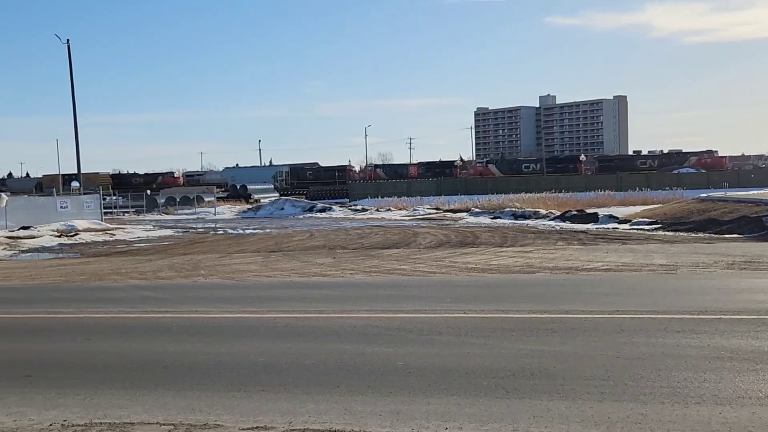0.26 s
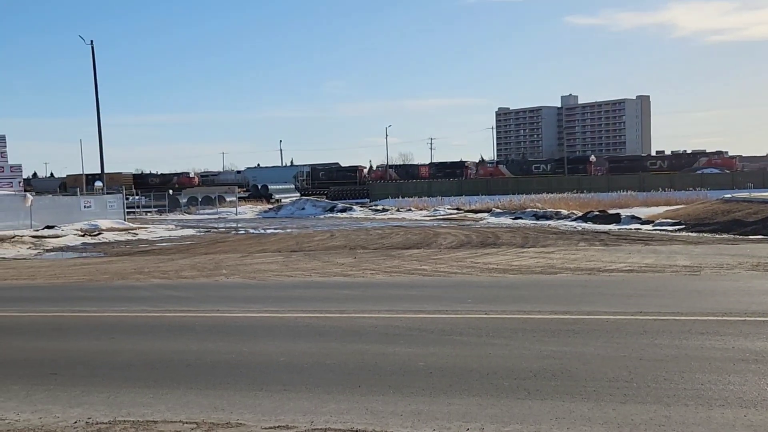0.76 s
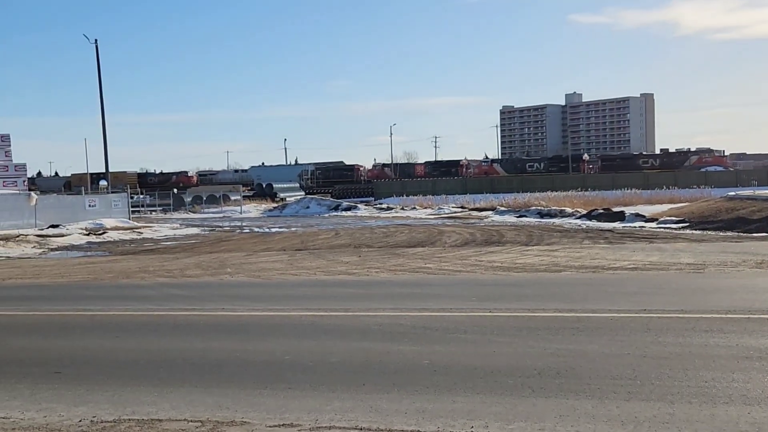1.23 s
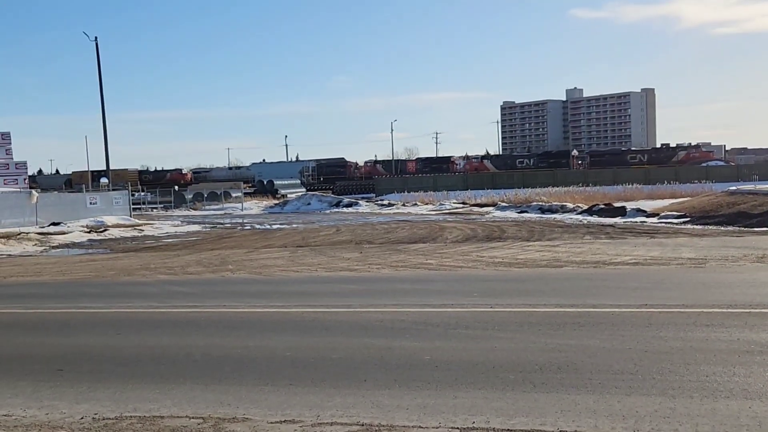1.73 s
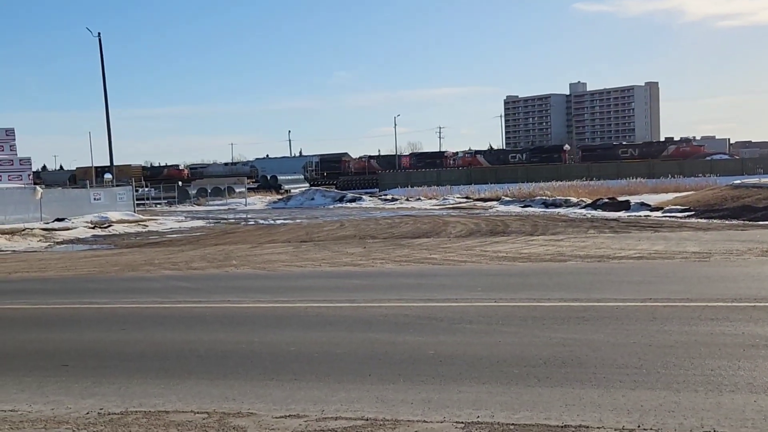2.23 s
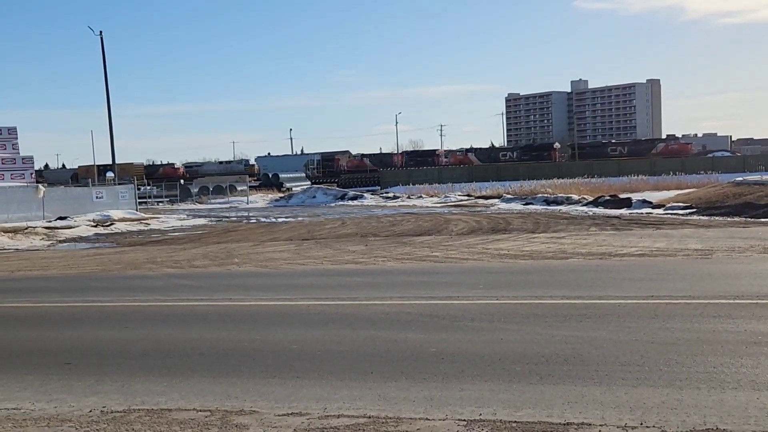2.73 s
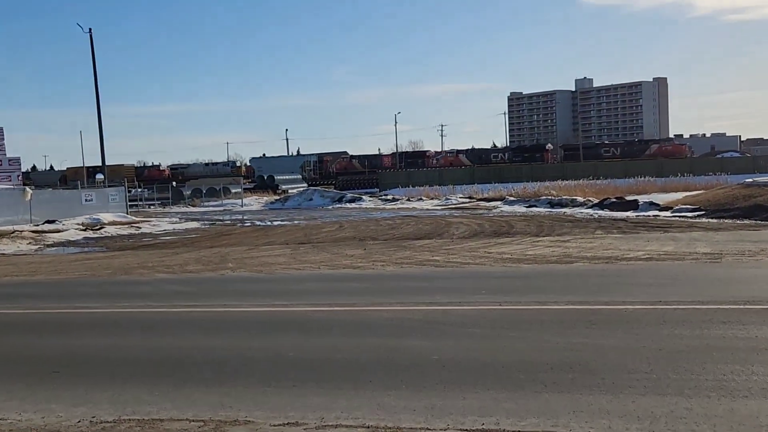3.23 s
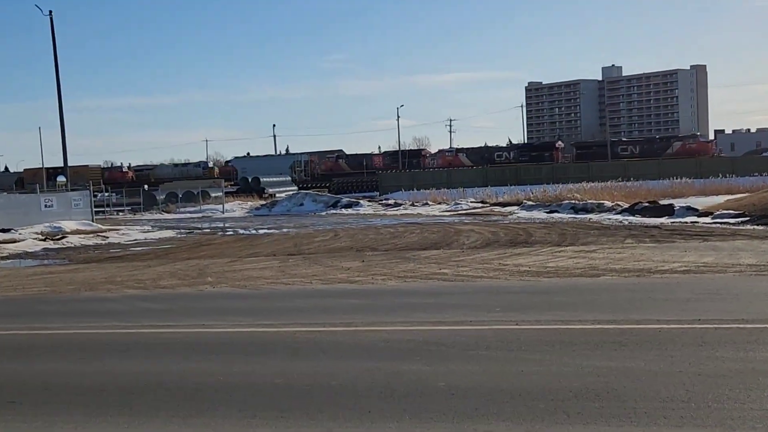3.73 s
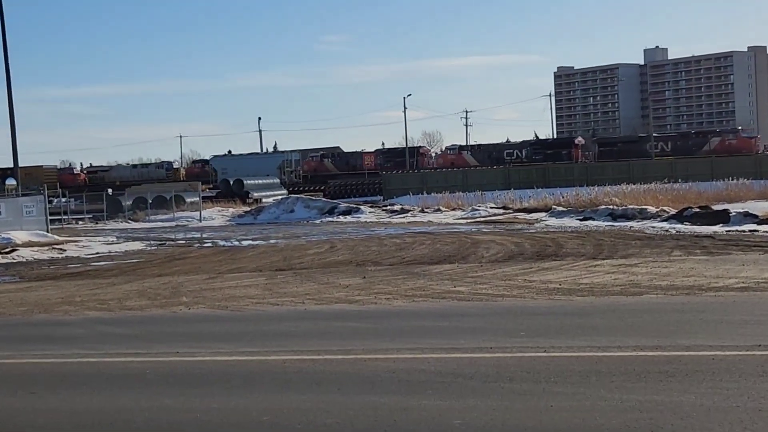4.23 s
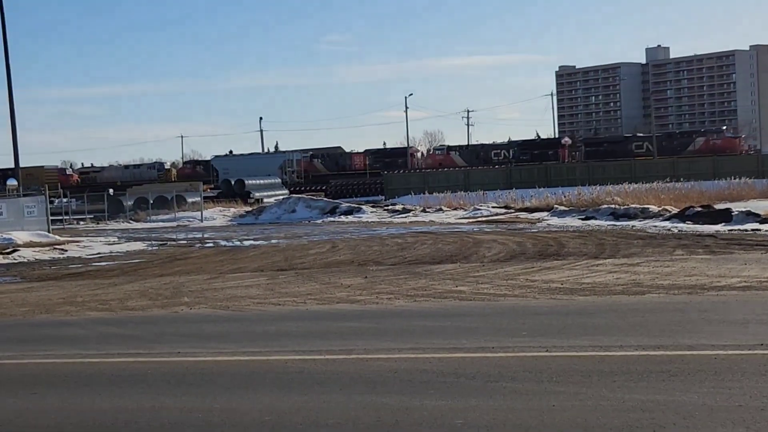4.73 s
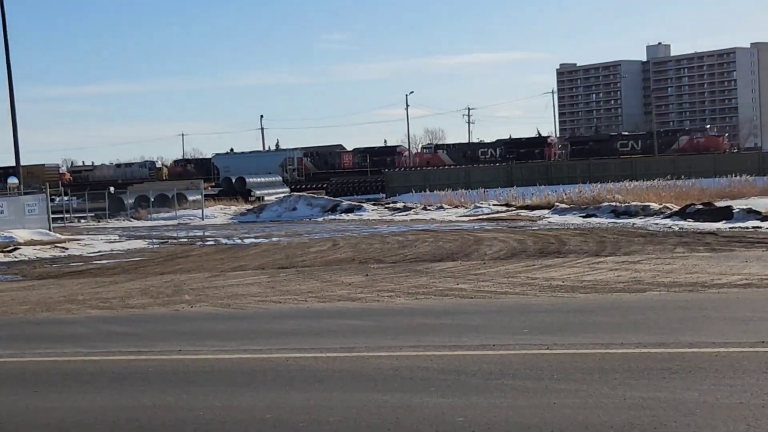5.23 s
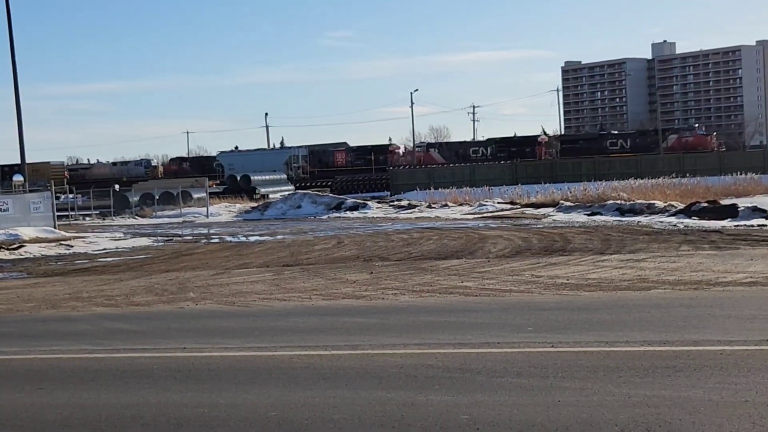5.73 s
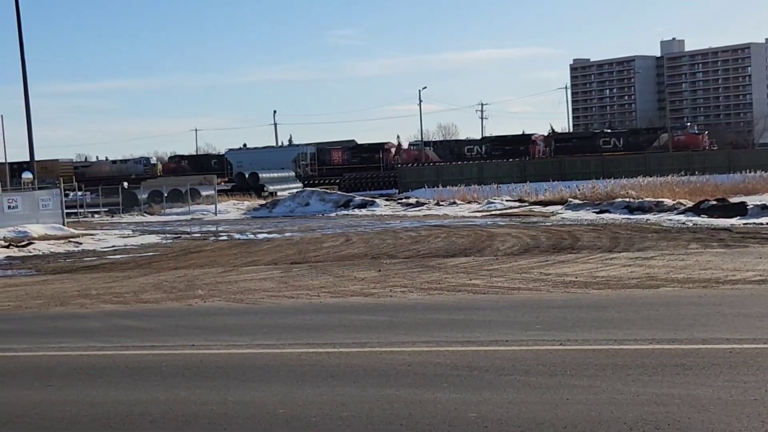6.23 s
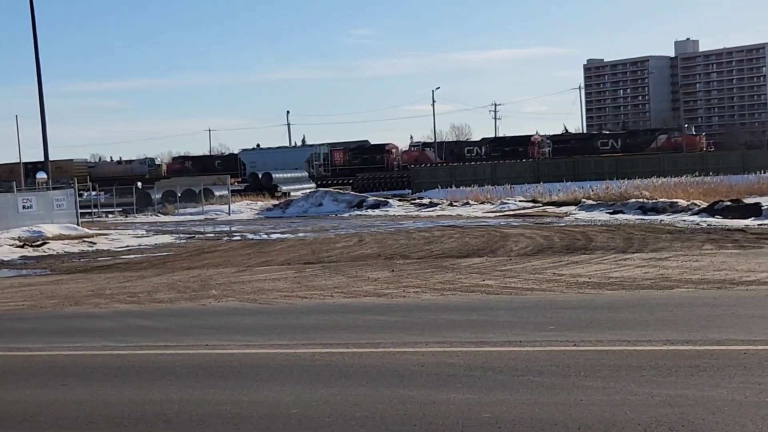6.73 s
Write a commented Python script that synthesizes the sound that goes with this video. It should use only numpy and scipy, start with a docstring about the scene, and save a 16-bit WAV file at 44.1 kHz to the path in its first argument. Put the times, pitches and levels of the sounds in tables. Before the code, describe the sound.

Diesel locomotives creep through a rail yard with a deep, uneven throb and a hollow roar of cooling fans, slowly growing louder. At the start, the tyre noise of a pickup that has just passed fades away to the left with a faint gritty hiss. A wheel rings faintly on the rail about five seconds in. Soft scuffs and tiny ticks sound close to the hand-held phone's microphone throughout.

```python
"""A deep diesel throb slowly swells over a roar of fans: locomotives creep through a rail yard across a road.
Unequal cylinders sound low tones and every firing puffs gas from the stack; a wheel flange sings briefly.
A pickup that has just passed fades away to the left; its tyres hiss on grit and throw one clicking stone.
Soft, gritty scuffs and a few small ticks sound close to the two microphone ports of a hand-held phone."""
import sys
import numpy as np
from scipy import signal
from scipy.fft import rfft, irfft, next_fast_len
from scipy.io import wavfile
from scipy.ndimage import uniform_filter1d, map_coordinates

SR = 44100
rng = np.random.default_rng(int(sys.argv[2]) if len(sys.argv) > 2 else 0)


def to_wav(s):
    """Save 16-bit WAV."""
    ch = np.atleast_2d(s).T  # columns
    pcm = np.round(np.clip(ch, -1, 1) * 32767)  # PCM
    wavfile.write(sys.argv[1], SR, pcm.astype(np.int16))


N = 307377
TIME = np.arange(N) / SR
SIZE = next_fast_len(N + 8192, True)
FREQ = np.maximum(np.arange(SIZE // 2 + 1) * SR / SIZE, 1)
PORT_LAG_S = 0.00055  # travel time from one port to the other

# the strongest exhaust swells: top_s, length_s, throb_lift_db, bark_lift_db, pitch_hz
SWELLS = [(0.04, 0.038, 8.5, -10, 60), (0.457, 0.077, 4.5, 2, 62), (0.596, 0.054, 2, 6.5, 56),
          (0.879, .07, 4, 1.5, 63), (0.991, .09, 6, 0, 59), (1.197, 0.09, 2, -4, 52),
          (1.581, .18, 4, -1.5, 55), (1.876, 0.085, 3, 1.5, 54), (2.395, 0.11, 4, 1.5, 51),
          (2.63, 0.091, 2.5, -2, 55.7), (2.875, .08, 3, 0.5, 55), (3.049, .12, 3, 0, 57),
          (3.411, 0.078, 1.5, 6.5, 55), (3.49, 0.1, 5.5, -1, 56), (3.855, .14, 3, 1.5, 62),
          (4.014, 0.072, 3, 3.5, 54), (4.313, 0.055, 3.5, 0.5, 52), (4.663, 0.14, 3, 2, 68),
          (4.775, 0.11, 3.5, 3.5, 55), (4.952, 0.14, 2.5, -1, 66), (5.267, .08, 2, 2, 59),
          (5.441, 0.15, 3, 3.5, 49), (5.553, 0.15, 4, 3, 56), (5.68, .08, 3.5, -2, 51),
          (5.798, 0.1, 4.5, 0, 69), (5.936, 0.13, 7.5, 2, 55), (6.199, .1, 2, 0, 50),
          (6.474, .12, 2, 2, 48), (6.619, 0.09, 3.5, -3, 66), (6.719, 0.072, 4, 3, 65)]


def undb(db):
    """Decibels to gain."""
    return 10 ** (np.asarray(db) / 20)


def unit(x):
    """Scale to rms 1."""
    return x / np.sqrt(np.mean(x ** 2))


def curves(rows):
    """Automation lanes: each column after the first, joined by straight lines in time."""
    times, *columns = np.transpose(rows)
    return [np.interp(TIME, times, column) for column in columns]


def step(at_s, span_s):
    """A smooth change from 0 to 1 around at_s."""
    return (1 + np.tanh((TIME - at_s) / span_s)) / 2


def swell(at_s, length_s):
    """A smooth rise from 0 to 1 and back."""
    return np.exp(-(2 * (TIME - at_s) / length_s) ** 2)


def walk(rate_hz):
    """A random modulator of rms 1: sample and hold, slewed twice."""
    hold = max(int(SR / rate_hz), 1)
    held = np.repeat(rng.standard_normal(N // hold + 2), hold)
    return unit(uniform_filter1d(uniform_filter1d(held, hold), hold)[:N])


def response(points):
    """An EQ curve through points of freq_hz, level_db."""
    hz, db = np.transpose(points)
    return undb(np.interp(np.log(FREQ), np.log(hz), db))


def resonances(rows):
    """An EQ curve of bells from rows of centre_hz, width_hz, gain_db."""
    return undb(sum(db / (1 + (2 * (FREQ - hz) / width) ** 2) for hz, width, db in rows))


def filtered(x, gain):
    """Apply a frequency response."""
    return irfft(rfft(x, SIZE) * gain, SIZE)[..., :N]


def driven(x, db, span_s):
    """Ride the gain so that the level of x, taken over span_s, follows a curve."""
    power = uniform_filter1d(x ** 2, int(span_s * SR))
    return x * undb(db) / np.sqrt(uniform_filter1d(power, int(span_s * SR / 2)))


def grains(per_s, spread_db):
    """Tiny clicks at random moments, many weak and a few strong."""
    sizes = undb(spread_db * np.minimum(rng.exponential(size=N), 4))
    return (rng.random(N) < per_s / SR) * rng.choice([-1, 1], N) * sizes


def airborne(gain, lag_s, scatter_db, shadow_hz=5000):
    """Stereo noise: a direct wave that reaches the left port lag_s late, plus scatter from all sides."""
    direct, mid, side = rfft(rng.standard_normal((3, SIZE))) * gain
    sign = np.array([[1], [-1]])
    alike = np.sinc(2 * FREQ * PORT_LAG_S)  # long waves meet both ports in step
    scattered = mid * np.sqrt((1 + alike) / 2) + sign * side * np.sqrt((1 - alike) / 2)
    # hand and phone scatter the short waves
    direct_share = 1 / (1 + undb(2 * scatter_db) + (FREQ / shadow_hz) ** 4)
    wave = irfft(direct * np.sqrt(direct_share), SIZE)
    ports = [map_coordinates(wave, [(TIME - delay_s) * SR], order=3, mode="grid-wrap")
             for delay_s in (lag_s / 2, -lag_s / 2)]
    return unit(ports + irfft(scattered * np.sqrt(1 - direct_share), SIZE)[:, :N])


def road_grit(swell_db=3.0, grain_db=1.0):
    """A faint, bright hiss of grit under the departing tyres comes and goes, far to the left."""
    # tone of the hiss: freq_hz, level_db
    spectrum = [(2500, -26), (3400, -6), (4050, 1.5), (4700, -1.5), (5500, -1), (6500, -15), (8000, -21),
                (10500, -35), (15000, -41)]
    # fader of the hiss: time_s, level_db
    fader = [(0, -70), (1.05, -61), (1.45, -68.5), (3.3, -67.5), (4.4, -69.5), (4.9, -82), (6.97, -81.5)]
    level_db, = curves(fader)
    hiss = airborne(response(spectrum), lag_s=-0.00048, scatter_db=-1.0, shadow_hz=7000)
    return hiss * undb(level_db + swell_db * walk(16) + grain_db * walk(300))


def falling_grit(start_db=-67, fade_db_per_s=4.5, end_s=1.4, flurry_db=4.0):
    """Fine grit thrown up by the tyres patters back on the road in flurries and dies out."""
    # tone of the patter: freq_hz, level_db
    spectrum = [(1800, -4), (3150, 16), (4500, 3), (5400, 8), (6500, -4), (9000, -2), (11000, -8),
                (13000, -3.5), (14500, -4.5), (16000, -8)]
    spray = unit(filtered(grains(per_s=900, spread_db=4.0), response(spectrum)))
    ports = np.array([spray, np.roll(spray, int(PORT_LAG_S * SR))])
    level_db = start_db - fade_db_per_s * TIME + flurry_db * walk(10)
    return ports * undb(level_db) * (1 - step(end_s, 0.12))


def flange(at_s=5.07, attack_s=0.037, hold_s=0.14, release_s=0.08, pitch_hz=1700, level_db=-47):
    """A faint, wavering ring of steel wheel on rail swells, holds and dies away."""
    since = TIME - at_s
    envelope = np.exp(np.minimum(since, 0) / attack_s - np.maximum(since - hold_s, 0) / release_s)
    wavering_hz = pitch_hz * (1 + 0.0045 * walk(60))
    return unit(np.sin(2 * np.pi * np.cumsum(wavering_hz) / SR)) * envelope * undb(level_db)


def ticks(decay_s=0.0006, fizz_s=0.035, rattle_db=-19):
    """Tiny hard contacts close by: a strike, a brief rattle and a sliding fizz through one resonance."""
    # contacts: start_s, ring_hz, width_hz, peak_db, left_minus_right_db, fizz_re_rattle_db
    hits = [(.059, 14400, 1500, -51, -2, -19), (.357, 14000, 1800, -55, 1, -14),
            (.431, 13900, 1500, -54, 0, -16), (1.128, 6300, 450, -38.5, 4, -23),
            (1.259, 14000, 1500, -52, -3, -16), (1.574, 12500, 4000, -49, 2, -4),
            (2.078, 13000, 4000, -51, 0.5, -10.5), (2.56, 12000, 4000, -57, -2, -5),
            (4.083, 10300, 4500, -40, 3, -15.5), (5.0098, 14450, 800, -29, 5, -35),
            (5.046, 13500, 3000, -44, 4, -29), (5.245, 4100, 650, -35.5, -2, -18)]
    out, t = np.zeros((2, N)), TIME[:8192]
    for start_s, hz, width_hz, peak_db, pan_db, fizz_db in hits:
        envelope = np.exp(-t / decay_s) + undb(fizz_db) * np.exp(-t / fizz_s)
        rattle = rng.standard_normal((2, len(t))) * envelope
        strike = (t == 0) + undb(rattle_db) * rattle
        b, a = signal.iirpeak(hz, hz / width_hz, fs=SR)
        low_cut = signal.butter(2, 0.45 * hz, "high", fs=SR, output="sos")  # small things radiate no bass
        ring = signal.sosfilt(low_cut, signal.lfilter(b, a, strike))
        gains = undb(peak_db + np.array([[pan_db], [-pan_db]]) / 2)
        start = int(start_s * SR)
        out[:, start:start + len(t)] += ring / np.abs(ring).max() * gains
    return out


def scuffs_and_stone(catch_db=0.5, contact_db=4.5, pivot_hz=1800, crackle_hz=3000, ring_width=0.13):
    """Short, close rubs catch and crackle on tiny grains; a stone thrown by the pickup's tyre clicks once."""
    # broad tone of the contacts: freq_hz, level_db
    spectrum = [(400, -19), (1120, -4.5), (1450, 0.5), (1850, -0.5), (2250, -7), (2750, -19.5),
                (3400, -24.5), (4000, -26.5), (4700, -33.5), (6300, -37.5), (7900, -42), (10000, -56.5),
                (15000, -68)]
    # resonances common to all contacts: centre_hz, width_hz, gain_db
    rings = [(1270, 100, 5.5), (1472, 160, 6), (1780, 60, 5), (2220, 460, 6), (2730, 160, 3.5),
             (2880, 170, 5.5), (3830, 530, 6.5), (4600, 350, -3), (5280, 280, 7), (6400, 260, 0.5),
             (7740, 500, 5.5)]
    # rubs, and the stone's click at 2.213 s: start_s, length_s, gain_db, tilt_db_per_octave, ring_hz, ring_db
    events = [(0.894, 0.14, -41.5, 1, 3370, 8), (0.93, 0.052, -40.5, -3.5, 1450, 4),
              (1.1, 0.031, -41, -1, 1750, 6), (1.578, 0.098, -49.5, 4.5, 5250, 7),
              (1.882, .07, -47, -0.5, 3700, 9), (2.079, 0.064, -44, 2.5, 3300, 1),
              (2.213, 0.0078, -45, -1.5, 1450, 0), (2.376, 0.1, -51, 4, 4000, 4),
              (2.565, .03, -55, 5.5, 7400, 6), (2.855, 0.085, -46.5, 3, 5200, 7),
              (3.348, 0.11, -49, 1, 3800, 5), (3.604, 0.053, -46.5, -1, 7300, 18),
              (3.851, 0.064, -44, 4.5, 5200, 6), (4.096, 0.07, -51.5, 4, 3800, 8),
              (4.33, 0.059, -41, -0.5, 5200, 12), (4.553, 0.037, -43.5, 2, 7500, 6),
              (4.77, 0.044, -38, 0.5, 2150, 3), (4.807, 0.078, -44.5, 3, 3900, 3),
              (5.039, 0.039, -37.5, 2, 5250, 2), (5.076, 0.066, -53.5, 6, 3300, -1),
              (5.149, 0.033, -47, 1, 5300, 11), (5.361, 0.084, -42, 1.5, 7750, 1),
              (5.426, 0.076, -43, 0, 1500, 5), (5.528, 0.023, -35.5, 0, 1800, 4.5),
              (5.549, 0.045, -49.5, 3, 7800, 2.5), (5.834, 0.088, -45, -0.5, 3900, 6),
              (5.903, 0.12, -43, 1, 2800, 6), (6.334, 0.05, -41.5, -2, 3800, 4.5),
              (6.382, 0.1, -41, -0.5, 5300, 1.5), (6.647, 0.041, -33.5, -2.8, 7500, 4),
              (6.685, 0.067, -46.5, -2.5, 3900, 6), (6.916, 0.061, -46, 1.5, 7500, 7)]
    body = response(spectrum) * resonances(rings)
    crackle = unit(filtered(grains(per_s=600, spread_db=2.2), body * np.hypot(1, FREQ / crackle_hz)))
    noise = airborne(body, lag_s=0.00003, scatter_db=0.5)
    texture = unit((noise + crackle) * undb(catch_db * walk(130)))
    contact_hz = np.arange(1000, 10000, 130)
    contacts = rng.uniform(-1.4, 1, (len(events), len(contact_hz)))  # a random EQ for each contact
    out = np.zeros((2, N))
    for (start_s, length_s, gain_db, tilt_db, ring_hz, ring_db), contact in zip(events, contacts):
        start = int(start_s * SR)
        piece = texture[:, start:start + 12000]
        count = piece.shape[1]
        hz = np.maximum(np.arange(count // 2 + 1) * SR / count, 1)
        colour_db = tilt_db * np.maximum(np.log2(hz / pivot_hz), -1)
        colour_db += contact_db * np.interp(hz, contact_hz, contact)
        colour_db += ring_db / (1 + (2 * (hz / ring_hz - 1) / ring_width) ** 2)
        piece = irfft(rfft(piece) * undb(colour_db), count)
        progress = TIME[:count] / length_s
        envelope = np.minimum(progress / 0.27, 1) * np.exp(-np.maximum(progress - 0.7, 0) / 0.44)
        out[:, start:start + count] += piece * envelope * undb(gain_db)
    return out


def fans(whine_hz=664, whine_db=-17, flutter_db=1.43, rasp_hz=2700, rasp_db=2.5, grain_db=1.0):
    """Cooling fans and machinery roar with a hollow hum, an uneven rasp and a faint, unsteady whine."""
    # broad tone of the roar: freq_hz, level_db
    spectrum = [(200, 3.5), (350, 9), (480, -0.6), (620, 7), (800, 4.5), (1030, -5.5), (1550, 2.5),
                (2250, -7), (2750, -21), (3200, -23), (4100, -26), (5000, -34), (7500, -36), (11000, -60.5)]
    # its resonances and hollows: centre_hz, width_hz, gain_db
    rings = [(556, 42, 0), (730, 42, 3), (990, 55, -3), (1090, 100, 4), (3060, 120, 5), (3250, 260, -4),
             (4120, 300, -0.5), (4550, 300, -4), (6300, 300, 6), (6750, 260, -3.5)]
    # fader of the roar: time_s, level_db
    fader = [(0, -41.5), (1.5, -42), (2.5, -40.7), (3.2, -41), (4, -39.5), (4.7, -38.5), (5.5, -38),
             (6.2, -38.5), (6.97, -38.5)]
    level_db, = curves(fader)
    air = airborne(response(spectrum) * resonances(rings), lag_s=0.00005, scatter_db=8.0)
    body = filtered(air, 1 / (1 + (FREQ / rasp_hz) ** 8))
    roar = body * undb(flutter_db * walk(14))
    rasp = (air - body) * undb(rasp_db * walk(22) + grain_db * walk(260))
    wavering_hz = whine_hz * (1 + 0.01 * walk(25))
    whine = np.sin(2 * np.pi * np.cumsum(wavering_hz) / SR) * undb(6.6 * walk(8))
    return (roar + rasp + undb(whine_db) * unit(whine)) * undb(level_db)


def pickup(passed_s=-0.58, tyre_db=-33.5, doubling_db=5.5, ease_s=4.4, flutter_db=0.6, air_hz=7000):
    """Tyre noise recedes to the left, weaker with each doubling of distance; the air takes its treble."""
    # broad tone of the tyres: freq_hz, level_db
    spectrum = [(250, -4.5), (500, -7), (680, -5.5), (900, -1), (1200, 0), (1500, -5.5), (1800, -7.5),
                (2150, -8), (2650, -26.5), (3300, -27), (3900, -27.5), (4700, -33), (5400, -30.5),
                (6500, -35.5), (9000, -38), (11000, -43), (15000, -45)]
    # tyre resonances: centre_hz, width_hz, gain_db
    rings = [(863, 81, 4.5), (1500, 190, 5), (2150, 280, 1), (3520, 460, 5.5), (5640, 600, 2.5)]
    since = TIME - passed_s
    level_db = tyre_db - doubling_db * np.log2(since)
    level_db += 0.5 * np.maximum(TIME - ease_s, 0)  # the fade eases towards the end
    bearing = np.arctan(since / 0.12)
    tone = response(spectrum) * resonances(rings)
    tyres = airborne(tone, lag_s=-0.00044 * np.sin(bearing), scatter_db=-8, shadow_hz=8000)
    shade = undb(-3 / (1 + (2600 / FREQ) ** 6))  # the phone shades the right port
    tyres = filtered(tyres, np.array([np.ones(len(FREQ)), shade]))
    hiss = filtered(tyres, 1 / (1 + (air_hz / FREQ) ** 4))
    treble_gain = undb(0.7 * (level_db - level_db[0]))
    return (tyres + hiss * (treble_gain - 1)) * undb(level_db + flutter_db * walk(16))


def drone(waver_db=1.5, octave_db=-17):
    """The sustained firing note of one locomotive, sagging slightly as its engine slows."""
    # path of the note, its level against the rush of gas: time_s, pitch_hz, level_db
    path = [(0, 70, -9.5), (2.4, 70.14, -9.5), (3.2, 70.6, -6.5), (3.9, 69.97, -2.5), (4.25, 69.37, -14.5),
            (4.8, 68.83, 0.5), (5.2, 68.85, -2.5), (5.8, 68.1, -2), (6.2, 67.58, -10.5), (6.65, 66.78, 4),
            (6.97, 65.4, 0.5)]
    pitch_hz, level_db = curves(path)
    phase = 2 * np.pi * np.cumsum(pitch_hz) / SR
    note = unit(np.sin(phase) + undb(octave_db) * np.sin(2 * phase))
    return note * undb(level_db + waver_db * walk(7.8))


def firing_notes(note_db=4.5, linger=1.4):
    """At each swell a low firing note stands out of the gas; the stronger the swell, the purer it is."""
    notes = np.zeros(N)
    for top_s, length_s, lift_db, _, pitch_hz in SWELLS:
        note = np.sin(2 * np.pi * pitch_hz * TIME + rng.uniform(0, 2 * np.pi))
        notes += swell(top_s, length_s * linger) * undb(note_db + lift_db) * note
    return notes


def engine_orders(cycle_phase, nearness, waver_db=3.0, drift_rad=0.51):
    """Unequal cylinders sound multiples of the working cycle, wavering as several engines beat."""
    # balance of the strongest orders: cycle_multiple, far_db, near_db
    orders = [(4, -18.5, -24), (5, -16.5, -17), (8, -6, 0.5), (9, -5.5, -5.5), (10, -1.5, -12),
              (15, -2.5, -10), (20, -11.5, -20.5), (23, -18.5, -18), (24, -12.5, -16.5), (26, -15.5, -17.5),
              (28, -20, -13.5), (31, -17.5, -11), (33, -17, -12.5), (35, -12, -19), (42, -33.5, -22)]
    tones = np.zeros(N)
    for multiple, far_db, near_db in orders:
        level_db = far_db + nearness * (near_db - far_db) + waver_db * walk(2.97)
        phase = multiple * cycle_phase + rng.uniform(0, 2 * np.pi) + drift_rad * walk(2.494)
        tones += undb(level_db) * np.sin(phase)
    return unit(tones)


def exhaust_levels(nearness, throb_far_db=-23.5, bark_far_db=-29.0, chug_db=1.3, lull_db=-4):
    """Faders for throb and bark: both rise with nearness and move at each swell; the throb also chugs."""
    opening_lull = lull_db * (1 - step(0.24, 0.02))
    throb_db = throb_far_db + 3 * nearness + opening_lull + chug_db * walk(22)
    bark_db = bark_far_db + 5 * nearness
    for top_s, length_s, throb_lift_db, bark_lift_db, _ in SWELLS:
        lift = swell(top_s, length_s)
        throb_db += throb_lift_db * lift
        bark_db += bark_lift_db * lift
    return throb_db, bark_db


def exhaust(cycle_hz=6.12, firing_order=9, puff_depth=0.32, orders_db=-2.0, split_hz=88):
    """Each firing puffs turbulent gas from the stack: a deep throb with a hollow bark above it."""
    # the train creeping closer: time_s, nearness_0_to_1
    approach = [(0, 0.26), (2.1, 0.2), (3.3, 0.58), (4.7, 0.72), (6.97, 1)]
    # tone of the exhaust stack: freq_hz, level_db
    stack = [(18, -33.5), (28, -17), (40, -5), (52, 0), (66, -8), (80, -4.5), (100, -6.5), (130, -12),
             (195, -12), (240, -18), (310, -26.5), (420, -38.5), (600, -66.5), (1000, -98)]
    nearness, = curves(approach)
    cycle_phase = 2 * np.pi * np.cumsum(cycle_hz * (1 + 0.003 * walk(1.216))) / SR
    tones = engine_orders(cycle_phase, nearness)
    puffs = rng.standard_normal(N) * (1 + puff_depth * np.cos(firing_order * cycle_phase))
    gas = unit(filtered(puffs, response(stack)))
    throb_db, bark_db = exhaust_levels(nearness)
    tones_db = orders_db + 0.54 * (throb_db - np.mean(throb_db))  # a louder throb has a clearer pitch
    engines = gas + undb(tones_db) * tones + drone() + firing_notes()
    throb = filtered(engines, 1 / (1 + (FREQ / split_hz) ** 10))
    bark = engines - throb
    return driven(throb, throb_db, span_s=0.098) + driven(bark, bark_db, span_s=0.87)


def scene(echo_db=-21, echo_decay_s=0.08):
    """The exhausts sit in the centre, widened by a weak echo off the yard, with the rest around them."""
    engines = exhaust()
    tail = rng.standard_normal(SR // 2) * np.exp(-TIME[:SR // 2] / echo_decay_s)
    echo = unit(filtered(engines, rfft(tail, SIZE))) * np.std(engines) * undb(echo_db)
    locomotives = engines + np.array([echo, -echo]) + fans()
    return locomotives + pickup() + flange() + road_grit() + falling_grit() + scuffs_and_stone() + ticks()


def record(dry, fade_s=0.003, top_hz=15750):
    """Each port adds its own colour and phase; the ends fade quickly and the top is cut."""
    # colour difference between the ports: freq_hz, left_minus_right_db
    port_colour = [(50, 0.6), (400, 0.1), (800, -1.5), (1300, 0), (1700, -2.5), (2100, -8.5), (2600, 0),
                   (3200, 0.5), (4200, 4), (5200, 1), (6300, 4), (7400, -0.5), (8400, -7.5), (10000, -4.5),
                   (12000, 0.5), (14300, 8.5)]
    # phase turn from the right port's resonance near 2 kHz: freq_hz, left_lead_rad
    port_phase = [(600, 0), (1000, -0.11), (1400, -0.6), (1750, -0.86), (2200, -0.57), (2700, -0.41),
                  (3300, 0.36), (4300, -0.66)]
    hz, lead_rad = np.transpose(port_phase)
    balance = np.sqrt(response(port_colour)) * np.exp(0.5j * np.interp(FREQ, hz, lead_rad))
    fades = np.minimum(np.minimum(TIME, TIME[::-1]) / fade_s, 1)
    coloured = filtered(dry * fades, np.array([balance, 1 / balance]))
    high_cut = signal.ellip(10, 0.1, 80, top_hz, fs=SR, output="sos")
    return signal.sosfilt(high_cut, coloured)


dry = scene()
out = record(dry)
to_wav(out)
```